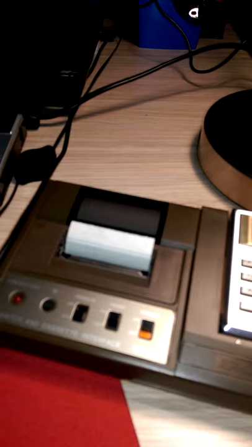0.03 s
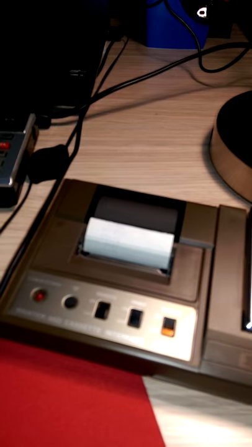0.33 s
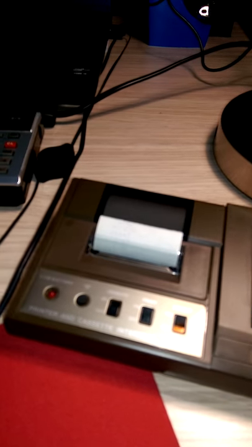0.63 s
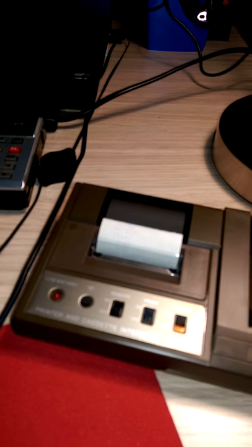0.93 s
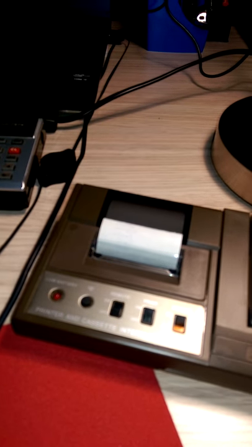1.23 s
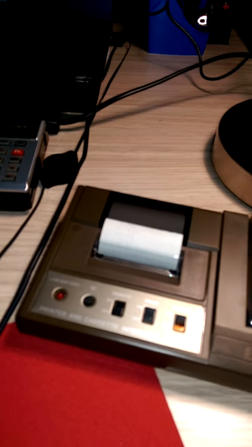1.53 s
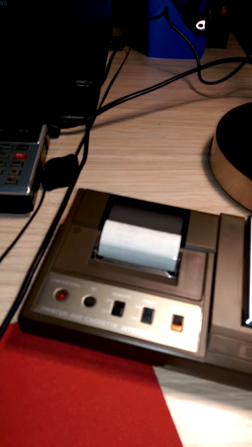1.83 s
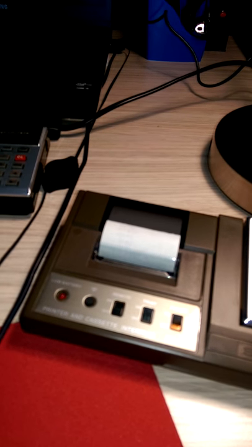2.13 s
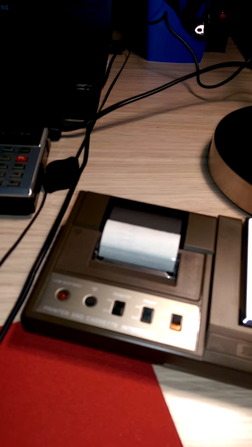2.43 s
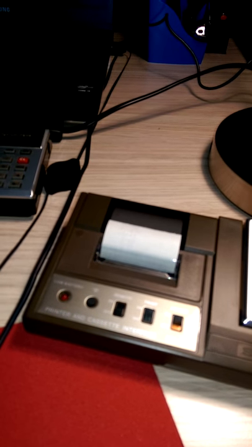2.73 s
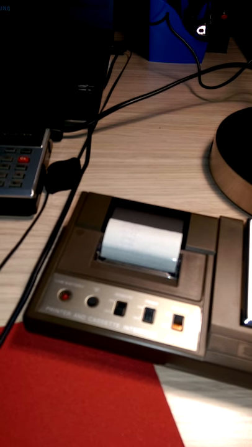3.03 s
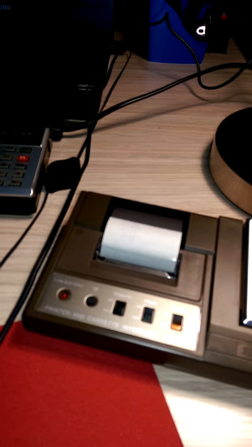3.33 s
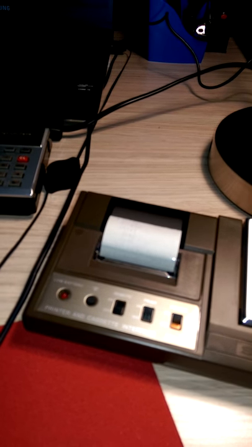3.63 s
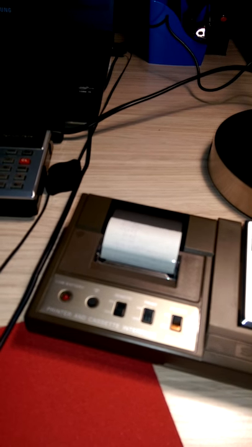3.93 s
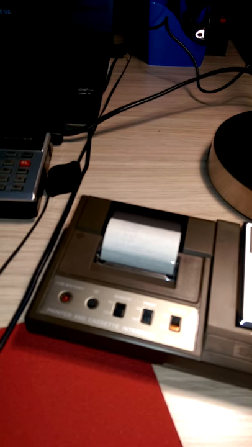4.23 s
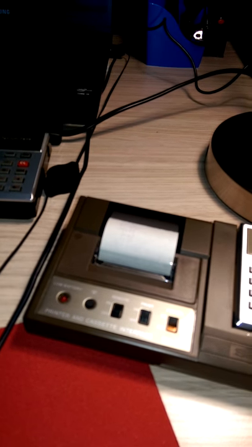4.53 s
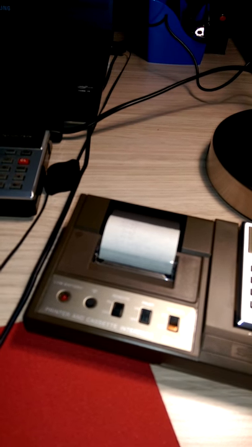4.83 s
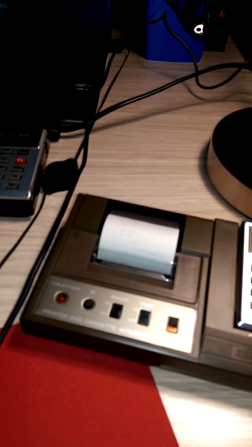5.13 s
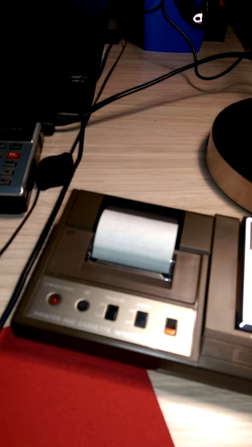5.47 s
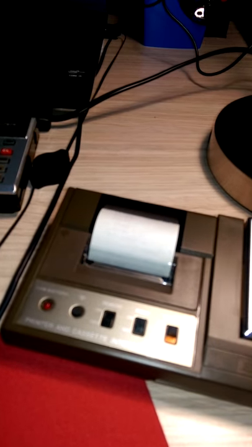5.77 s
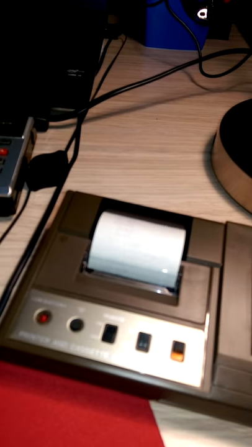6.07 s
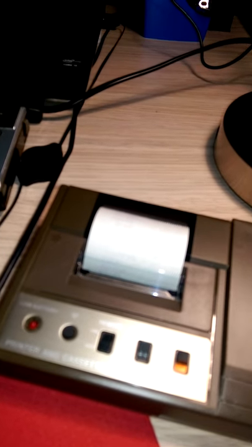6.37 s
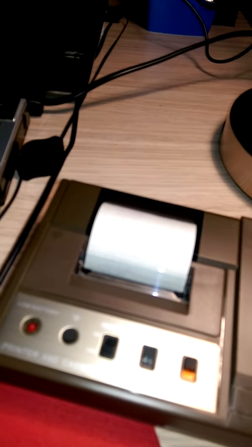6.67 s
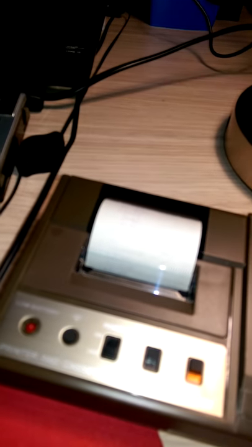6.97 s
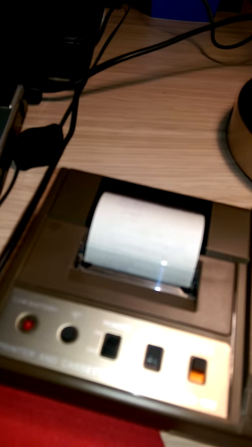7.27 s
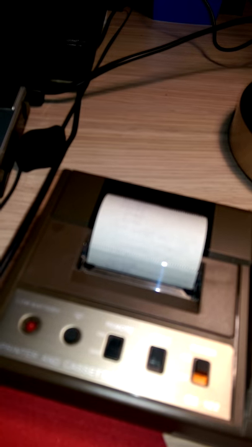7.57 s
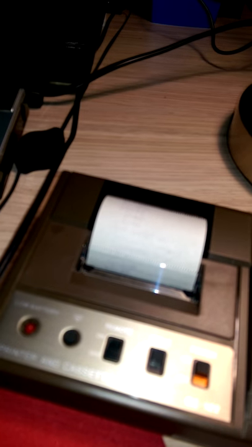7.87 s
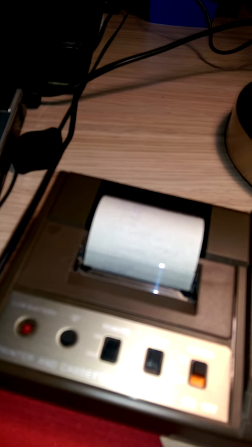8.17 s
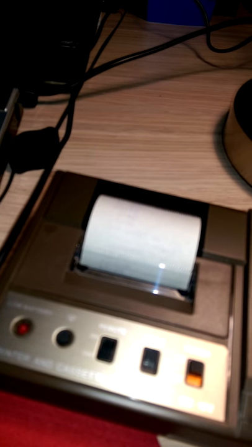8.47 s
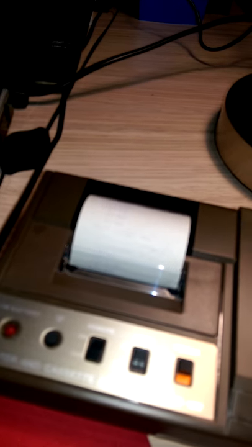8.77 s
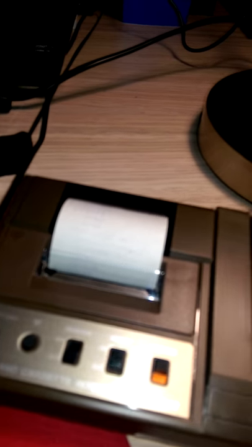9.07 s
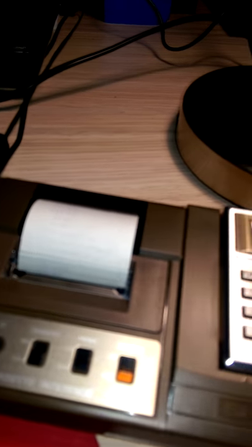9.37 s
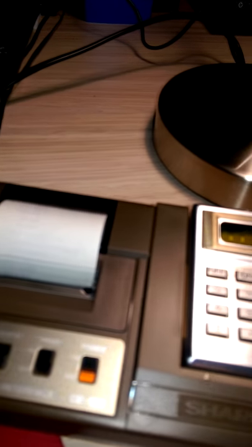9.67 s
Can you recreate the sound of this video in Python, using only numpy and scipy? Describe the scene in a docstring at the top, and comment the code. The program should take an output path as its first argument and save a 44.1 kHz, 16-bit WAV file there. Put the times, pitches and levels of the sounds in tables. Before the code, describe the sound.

Sharp buzzing bursts and rapid clicks come from a tiny mechanical printer, its geared motor whining until it cuts off in a quiet room.

```python
"""A shuttle dot-matrix printer

A tiny printer on a wooden desk prints six lines on a paper roll, then stops. A geared motor swings the
shuttle to and fro, one pass for each row of dots; the impacts of four needles excite resonances of the
platen, and a pawl steps the paper on. The left microphone port faces the printer, the right is
shaded. Mains hum fills the quiet room, and near the end a hand shifts on the microphone."""
import sys
import numpy as np
from scipy import signal
from scipy.fft import rfft, irfft, next_fast_len
from scipy.io import wavfile

SR = 44100
rng = np.random.default_rng(int(sys.argv[2]) if len(sys.argv) > 2 else 0)


def log_audio(samples):
    """Write samples as a 16-bit WAV file to the path given in sys.argv[1]."""
    # one column per channel
    frames = np.atleast_2d(samples).T
    # limit to full scale, then quantise
    limited = np.clip(frames, -1, 1)
    pcm = np.round(limited * 32767).astype(np.int16)
    wavfile.write(sys.argv[1], SR, pcm)


N = 427769
TIME = np.arange(N) / SR
QUADRATURE = np.array([[0], [np.pi / 2]])   # phases of two channels a quarter cycle apart

# even runs of needle blows, from a lone tick to a short rasp: start_s, length_s, dot_count, level_db
DOT_RUNS = [(0.0007, 0.0184, 4, 0), (0.0776, 0.0018, 3, 0), (0.0857, 0.049, 13, 0), (0.1937, 0.0018, 3, 0),
            (0.2059, 0.0442, 9, 0), (0.3052, 0.0082, 5, 2), (0.3206, 0.0168, 4, 2), (0.3426, 0.0073, 2, 0),
            (0.3574, 0.0059, 3, 1), (0.815, 0.0068, 5, 2), (0.832, 0.0057, 3, -4), (0.8483, 0.0095, 4, 2),
            (0.868, 0.0041, 2, -1), (0.9293, 0.0469, 13, -1), (0.9821, 0.0032, 2, 2),
            (1.0465, 0.0111, 2, 4), (1.0628, 0.0109, 5, 3), (1.0794, 0.0186, 4, 1), (1.1007, 0.0045, 4, 0),
            (1.1667, 0.0113, 4, 1), (1.1862, 0.0057, 3, 4), (1.2005, 0.0118, 4, 1), (1.2179, 0.012, 5, 0),
            (1.2862, 0.0286, 11, 2), (1.3206, 0.0143, 5, 3), (1.3424, 0.005, 4, 0), (1.4093, 0.0111, 2, 4),
            (1.4281, 0.0039, 2, -1), (1.4433, 0.0048, 3, 2), (1.4546, 0.0102, 2, 4), (1.5274, 0.0113, 6, 2),
            (1.5431, 0.0122, 5, -3), (1.5621, 0.0122, 6, 1), (1.5844, 0.0043, 2, -1),
            (2.0063, 0.0283, 11, 1), (2.0433, 0.0066, 4, 2), (2.0594, 0.0118, 2, 1), (2.1259, 0.0383, 8, 0),
            (2.1689, 0.0063, 2, 3), (2.1776, 0.0091, 2, 0), (2.241, 0.0492, 10, 0), (2.2927, 0.0088, 2, 2),
            (2.3565, 0.0079, 4, 2), (2.3728, 0.0084, 4, 1), (2.3893, 0.0293, 6, 0), (2.4726, 0.0061, 2, -1),
            (2.4887, 0.0268, 6, -1), (2.5215, 0.0111, 5, -2), (2.5875, 0.0163, 2, 1),
            (2.612, 0.0138, 7, -2), (2.6308, 0.0172, 4, 0), (2.7032, 0.0059, 2, 0), (2.719, 0.0116, 3, 2),
            (2.7381, 0.0068, 5, 1), (2.7533, 0.0116, 2, 0), (3.1855, 0.0079, 4, 3), (3.2048, 0.0054, 3, -1),
            (3.2884, 0.0213, 3, 1), (3.3145, 0.0213, 3, -1), (3.3952, 0.0107, 3, 1), (3.4161, 0.0059, 2, 0),
            (3.4374, 0.0109, 4, -4), (3.5098, 0.0054, 3, 1), (3.5254, 0.0057, 3, 0), (3.5474, 0, 1, -1),
            (3.62, 0.0107, 3, 1), (3.6415, 0.0161, 4, -4), (3.6707, 0.0029, 2, -1), (3.7388, 0.0136, 2, 1),
            (3.7599, 0.0079, 2, -2), (3.7839, 0.0025, 2, -1), (3.861, 0.0113, 5, 3),
            (3.8776, 0.0113, 5, -3), (4.3132, 0.0107, 5, 2), (4.3295, 0.0111, 2, 3), (4.346, 0.0082, 4, 2),
            (4.4277, 0.0159, 2, 1), (4.4483, 0.0027, 2, -1), (4.4544, 0.0238, 4, 2), (4.5408, 0.0161, 2, 2),
            (4.5594, 0.005, 2, 1), (4.5678, 0.024, 4, 3), (4.6549, 0.0082, 4, 2), (4.6714, 0.0166, 4, 3),
            (4.6916, 0.0082, 2, 3), (4.7705, 0.0161, 2, 3), (4.7893, 0.0172, 7, 0), (4.8147, 0.0107, 2, 1),
            (4.8857, 0.0159, 2, 1), (4.9125, 0.0238, 4, 1), (4.9989, 0.0163, 7, 1), (5.0229, 0.0172, 7, 0),
            (5.4832, 0.0111, 5, 4), (5.4991, 0.0113, 5, -1), (5.5864, 0.0127, 2, 0), (5.605, 0.0075, 2, 1),
            (5.6311, 0.0027, 2, 2), (5.6932, 0.022, 5, 1), (5.7252, 0.0086, 4, -1), (5.7447, 0.0027, 2, -1),
            (5.8102, 0.0052, 3, 2), (5.8229, 0.0093, 4, 3), (5.8508, 0, 1, -2), (5.9206, 0.0107, 3, 3),
            (5.9474, 0.0156, 2, 1), (5.9712, 0.0027, 2, 0), (6.0383, 0.0213, 2, 3), (6.0644, 0.0215, 3, -2),
            (6.1617, 0.0082, 4, 2), (6.1803, 0.0059, 3, -4)]
# a high, bright peak in hiss and clicks that shifts as the microphone moves: time_s, pitch_hz, level_db
BRIGHT_PEAK = [(1.4, 8654, -14.5), (1.7, 10820, -16.5), (2.8, 10690, -13.5), (3.5, 9590, 6.5),
               (5.2, 9310, 1)]
# spectrum of sliding friction: frequency_hz, level_db
FRICTION_SPECTRUM = [(800, -23), (2300, 2), (4400, -2), (5500, -6.5), (6500, -2), (10500, -3), (16000, -25)]
# hum of the mains, then of appliances: pitch_hz, level_db
HUM_TONES = [(120, -71), (224, -79), (325, -85)]


def needles(level_db=1, spread_db=1.5, frame_db=-5, bounce_s=.0061, bounce_db=-16):
    """Impact excitation: each dot is a blow, a metal crack and a rebound, and sets the printer ringing."""
    # spectrum of the impacts: frequency_hz, level_db
    impact_spectrum = [(90, -52), (700, -16.5), (1300, -14), (3200, -2.5), (4900, 1), (6100, 6.5),
                       (6850, -1), (7700, 3), (9300, 3), (10000, -3.5), (11500, 1.5), (15500, -12.5)]
    times, run_db = dots()
    strength, timing = rng.standard_normal((len(times), 2)).T
    gains = from_db(level_db + run_db + spread_db * strength)
    blows = clicks(times, gains)
    rebounds = clicks(times + bounce_s * (1 + .5 * timing), gains * from_db(bounce_db))
    impacts = blows + clatter(rebounds, t60_s=.0085) + from_db(frame_db) * clatter(blows, t60_s=.022)
    impacts += needle_cracks(times, gains)
    return colour(impacts, impact_spectrum) + ringing_tones(impacts)


def needle_cracks(times, gains, count=4, level_db=1, t60_s=.0085):
    """The needles fire in turn, each with its own impulse response, a burst of decaying noise."""
    age = TIME[:SR // 100]
    cracks = 0
    for k in range(count):
        crack = rng.standard_normal((2, len(age))) * from_db(-60 * age / t60_s)
        crack *= from_db(level_db) / np.linalg.norm(crack, axis=1, keepdims=True)
        crack[:, 0] = 0
        cracks += convolve(clicks(times[k::count], gains[k::count])[None], crack)
    return cracks


def ringing_tones(impacts, waver=.014):
    """Resonance: the platen rings; three more peaks colour the clicks and shift as the microphone moves."""
    # modes of the platen: pitch_hz, width_hz, level_db
    platen_modes = [(2554.5, 45, 9), (6140, 170, -8), (7960, 240, -5.5), (8898, 180, -8)]
    # the platen carries best at first, while the microphone faces it: time_s, level_db
    platen_reach = [(.2, 8.5), (.9, 2.5), (2.6, 6.5), (3.4, -2.5)]
    # lower ringing tone in the clicks, shifting from line to line: time_s, pitch_hz, level_db
    lower_tone = [(.3, 4500, 6), (1.4, 3851, -6.5), (2.05, 4300, 1), (3.5, 4200, -9), (5.8, 4050, 2.5)]
    # upper ringing tone, shifting likewise: time_s, pitch_hz, level_db
    upper_tone = [(.3, 6080, -0.5), (1.099, 5540, 5.5), (2.4, 5477, -10.5), (4.5, 5360, 2)]
    force = butterworth(impacts, 1200, "high")   # these tones carry no bass
    bend = 1 + waver * drift(60)   # the pitch wavers as the blows move along the platen
    platen = sum(from_db(db) * resonance(force, hz * bend, width) for hz, width, db in platen_modes)
    platen *= from_db(read(platen_reach, TIME)[0])
    bright = from_db(-7) * moving_ring(impacts, BRIGHT_PEAK, width_hz=600)
    lower = moving_ring(force, lower_tone, width_hz=300)
    upper = moving_ring(force, upper_tone, width_hz=230)
    return platen + bright + lower + upper


def dots():
    """Evenly spaced impulses make a rasp: the time (s) and level (dB) of every dot."""
    return np.transpose([(time_s, db) for start, length, count, db in DOT_RUNS
                         for time_s in np.linspace(start, start + length, round(count))])


def drive(flutter=.004304, wander=.003, gear_db=-35, thrum_db=-69):
    """Cyclic loading: whine, gear rattle and friction swell with each pass; the case resonates."""
    # one pass, pawl to pawl: pass_share, gear_db, whine_db, friction_db, speed_factor
    load_cycle = [(0, 0, -4.5, -3, 1.01), (.12, 2, -4.5, -0.5, 1.03), (.22, -4.5, 3, -2.5, 1),
                  (.35, -1, 2.5, -4, .985), (.48, -2, -5.5, -3.5, 1.005), (.6, -1.5, 5, -4, 1.018),
                  (.69, -2.5, 6.5, -2, .985), (.79, -3, -9.5, -3.5, .955), (.93, 0, 1.5, -2.5, .98),
                  (1, 2, -2.5, 6, 1.01)]
    # spectrum of the rattling teeth: frequency_hz, level_db
    gear_spectrum = [(60, -36.5), (270, -20.5), (330, -9.5), (410, -16.5), (520, -8), (660, -5.5),
                     (1150, -8.5), (1500, -6), (1850, 4.5), (2100, -17), (4500, -16), (12000, -50.5)]
    # modes of the plastic case: pitch_hz, t60_s, level_db
    case_modes = [(324.9, 0.18, -59.5), (1870, 0.08, -54)]
    speed_hz, effort_db = motor()
    load_db, mesh_db, friction_db, pace = read(load_cycle, pass_share())
    angle = phase(speed_hz * pace * (1 + flutter * drift(150) + wander * drift(20)))
    whine = gear_whine(angle, mesh_db)
    teeth = contact_noise(angle, rough_hz=400)
    gears = from_db(gear_db + load_db) * rms_one(colour(teeth, gear_spectrum))
    case_force = teeth * from_db(effort_db + load_db)
    case = sum(from_db(db) * rms_one(ring(case_force, hz, t60_s)) for hz, t60_s, db in case_modes)
    thrum = from_db(thrum_db) * np.sin(angle / 3) * np.sqrt(2)   # a 3:1 reduction gear
    friction = from_db(friction_db) * shuttle_friction(angle)
    return case + from_db(effort_db) * (whine + thrum + gears + friction)


def gear_whine(angle, mesh_db, mesh_order=6, rough_db=2.5, trim_db=-7.5):
    """Periodic tooth contact gives harmonics of the rotation; the higher ones vary more with the load."""
    # partials of motor and gears: shaft_order, level_db
    partials = [(1, -56), (2, -46), (3, -45), (5, -43.5), (6, -35.5), (7, -50)]
    whine = 0
    for order, db in partials:
        level_db = db + trim_db + mesh_db * order / mesh_order + rough_db * drift(130)
        whine += from_db(level_db) * np.sqrt(2) * np.sin(round(order) * angle + QUADRATURE)
    return whine


def shuttle_friction(angle, hiss_db=-32.5, peak_db=-40, half_width_hz=450):
    """Sliding friction gives a broad hiss; a high, bright peak in it shifts as the microphone moves."""
    grit = contact_noise(angle, rough_hz=900)
    hiss = from_db(hiss_db) * rms_one(colour(grit, FRICTION_SPECTRUM))
    peak_hz, reach_db = read(BRIGHT_PEAK, TIME)
    band = butterworth(grit, half_width_hz) * np.sin(phase(peak_hz))
    return hiss + from_db(peak_db + .5 * reach_db) * rms_one(band)


def contact_noise(angle, rough_hz, rough_db=3, throb=.24):
    """Amplitude modulation: the noise of rough contact flickers and throbs once per motor turn."""
    noise = rng.standard_normal((2, N))
    return noise * from_db(rough_db * drift(rough_hz)) * (1 + throb * np.sin(angle))


def motor(free_hz=324, print_sag=.04, coast_sag=.17, labour_db=1.5, stop_s=6.48):
    """Speed (Hz) and level (dB): load slows the motor and makes it louder; unpowered, it coasts."""
    lead_s, overrun_s, dot_s = .092, .027, .00276
    steps = paper_steps()
    powered = during(steps[:, 0] - lead_s, np.minimum(steps[:, -1] + overrun_s, stop_s))
    running = follow(powered, time_s=.017914)
    start, length, *_ = np.transpose(DOT_RUNS)
    load = follow(during(start, start + length + dot_s), time_s=.03)
    speed_hz = free_hz * (1 - print_sag * load) * (1 - coast_sag * (1 - running))
    return speed_hz, 20 * np.log10(running) + labour_db * load


def paper_steps(dot_rows=7, blank_rows=3, blank_pass_s=.1105):
    """The pawl's rhythm, one step a pass, quicker on blank rows: times (s) by line and row."""
    # printed lines, the first already under way: first_step_s, printing_pass_s
    text_lines = [(-.405, 0.1157), (.797, 0.1193), (1.993, 0.117), (3.156, 0.11196), (4.298, .1144),
                  (5.453, 0.11452)]
    start, pass_s = np.transpose(text_lines)[:, :, None]
    row = np.arange(dot_rows + blank_rows)
    return start + pass_s * np.minimum(row, dot_rows) + blank_pass_s * np.maximum(row - dot_rows, 0)


def pass_share():
    """The phase of the shuttle's cycle, 0 to 1 between paper steps."""
    steps = paper_steps().ravel()
    return np.interp(TIME, steps, np.arange(len(steps))) % 1


def pawl(level_db=-6, spread_db=2, catch_s=.009, catch_db=-5, t60_s=.009):
    """A double impact: the pawl ticks over a ratchet tooth, then snaps in."""
    # spectrum of the snap: frequency_hz, level_db
    snap_spectrum = [(300, -8), (7000, 4), (15500, -11)]
    steps = paper_steps()
    times = steps[steps > 0]
    gains = from_db(level_db + spread_db * rng.standard_normal(len(times)))
    snap = clatter(clicks(times, gains), t60_s)
    catch = clatter(clicks(times - catch_s, gains * from_db(catch_db)), t60_s)
    return colour(snap, snap_spectrum) + colour(catch, FRICTION_SPECTRUM)


def knocks(spread_db=.5, jitter_s=.0012):
    """Soft impacts of cam and pawl recur in every pass; each makes one damped mode swell and die."""
    # knocks of one pass: pass_share, pitch_hz, rise_s, peak_db
    knock_modes = [(0.039, 338.5, 0.0053, -49), (.09, 1016, 0.0049, -41), (0.129, 1739, 0.0057, -36),
                   (0.912, 3980, 0.0022, -35.5), (.98, 6489, 0.0011, -34.5)]
    steps = paper_steps().ravel()
    number, age = np.arange(len(steps)), TIME[:SR // 20]
    sound = 0
    for share, hz, rise_s, db in knock_modes:
        times = np.interp(number[:-1] + share, number, steps)
        timing, softness = rng.standard_normal((len(times), 2)).T
        hits = clicks(times + jitter_s * timing, (times > 0) * from_db(db - spread_db * softness))
        swell = age / rise_s * np.exp(1 - age / rise_s)
        sound += convolve(hits[None], swell * np.sin(2 * np.pi * hz * age + QUADRATURE))
    return from_db(motor()[1]) * sound


def spring(level_db=-37, rough_db=3, flutter=.0097):
    """Frequency modulation: the pawl's spring gives a rough falling chirp as it is drawn back."""
    # glide before each paper step: pass_share, pitch_hz, gain
    glide = [(.83, 2720, 0.0069), (.89, 2408, 1), (.94, 2229, 1), (.99, 2055, 0.095)]
    hz, gain = read(glide, pass_share())
    angle = phase(hz * (1 + flutter * drift(300)))
    return gain * from_db(level_db + motor()[1] + rough_db * drift(300)) * np.sin(angle + QUADRATURE)


def beaming(x, band_hz=(10700, 12100)):
    """Directivity: the treble beams, so its level depends on where the microphone is held."""
    # level of the treble band: time_s, level_db
    treble_reach = [(.3, -7), (1.3, -1.5), (3.2, 4.5), (4.8, -2)]
    band = signal.sosfiltfilt(signal.butter(2, band_hz, "band", fs=SR, output="sos"), x)
    return x + (from_db(read(treble_reach, TIME)[0]) - 1) * band


def ports(x, lag_s=0):
    """Coherence: long waves reach both ports much alike, short ones differ; the right lags by lag_s."""
    # likeness of the two ports: frequency_hz, correlation
    coherence = [(130, 0.54), (640, 0.908), (1400, 0.31), (3000, 0.041)]
    size = next_fast_len(N + SR // 10)
    left, right = rfft(x, size)
    hz = np.fft.rfftfreq(size, 1 / SR)
    alike = np.clip(at_hz(coherence, hz), 0, 1)
    right = (alike * left + np.sqrt(1 - alike ** 2) * right) * np.exp(-2j * np.pi * hz * lag_s)
    return irfft(np.array([left, right]), size)[:, :N]


def shadow(x):
    """Acoustic shadow: the microphone's body screens the right port from short waves."""
    # response of the right port: frequency_hz, gain_db
    shade = [(200, -5.5), (700, 1.5), (1300, -3.5), (2200, -2.5), (3000, -8.5), (4200, -12), (5600, -25),
             (9000, -26.5), (11500, -22), (13800, -7)]
    return np.vstack([x[:1], colour(x[1:], shade)])


def room(x, wet_db=-20, t60_s=.45, dull_hz=3500, gap_s=.006):
    """Reverberation: a small furnished room answers with a faint, dull, exponentially decaying tail."""
    age = TIME[:SR // 2]
    tail = rng.standard_normal((2, len(age))) * from_db(-60 * age / t60_s) * (age > gap_s)
    tail = butterworth(tail / np.linalg.norm(tail[0]), dull_hz, order=1)
    return from_db(wet_db) * convolve(x[:1], tail)


def handling(attack_s=.0169, squeak_db=-64, squeak_width_hz=160):
    """Structure-borne sound: a hand shifting on the microphone thuds, rubs and briefly squeaks."""
    # shifts of the grip: start_s, decay_s, level_db
    grips = [(8.685, 0.0117, -49), (8.72, 0.302, -62)]
    # spectrum of thud and rub: frequency_hz, level_db
    grip_spectrum = [(40, -29.5), (235, 0.5), (450, -14.5), (14000, -31)]
    # glide of the squeak: time_s, pitch_hz, gain
    glide = [(8.72, 2119, 0.031), (8.76, 2033, 1), (8.87, 1924, 0.083)]
    envelope = sum(from_db(db) * (TIME > start) * np.exp(-np.abs(TIME - start) / decay_s)
                   for start, decay_s, db in grips)
    rub = follow(envelope, attack_s) * rms_one(colour(rng.standard_normal((2, N)), grip_spectrum))
    hz, gain = read(glide, TIME)
    squeak = rms_one(resonance(rng.standard_normal((2, N)), hz, squeak_width_hz))
    return ports(rub + from_db(squeak_db) * gain * squeak)


def transformer(hum_db=-70):
    """Magnetic hum: the mains transformer sounds harder while the motor draws current."""
    mains = np.sqrt(2) * np.sin(2 * np.pi * HUM_TONES[0][0] * TIME)
    return from_db(hum_db + motor()[1]) * mains


def background(floor_db=-69.5):
    """Ambient noise: steady hum tones over the broadband floor of still air."""
    # spectrum of the quiet room: frequency_hz, level_db
    floor_spectrum = [(25, -9.5), (80, -0.5), (280, -3), (900, -14.5), (14000, -23)]
    hum = sum(from_db(db) * np.sqrt(2) * np.sin(2 * np.pi * hz * TIME) for hz, db in HUM_TONES)
    air = rms_one(colour(rng.standard_normal((2, N)), floor_spectrum))
    return hum + from_db(floor_db) * ports(air)


def clatter(hits, t60_s):
    """Dense modes merge into noise: each hit leaves a decaying burst with the hit's own energy."""
    decay = from_db(-120 / (t60_s * SR))
    energy = signal.lfilter([1 - decay], [1, -decay], hits ** 2 + 1e-18)
    return np.sqrt(energy) * rng.standard_normal((2, N))


def ring(x, hz, t60_s):
    """A damped oscillator: a unit impulse starts a decaying sine of height 1."""
    decay, step = from_db(-60 / (t60_s * SR)), 2 * np.pi * hz / SR
    return signal.lfilter([0, np.sin(step)], [1, -2 * decay * np.cos(step), decay ** 2], x + 1e-18)


def resonance(x, hz, width_hz):
    """A resonator of gain 1 whose centre may move."""
    carrier = np.exp(1j * phase(hz))
    return 2 * np.real(carrier * follow(x / carrier, 1 / (np.pi * width_hz)))


def moving_ring(x, track, width_hz):
    """A resonator whose centre and gain follow a table."""
    hz, db = read(track, TIME)
    return from_db(db) * resonance(x, hz, width_hz)


def colour(x, spectrum, size=2048):
    """A minimum-phase filter with the given spectrum, made causal by folding the cepstrum."""
    cepstrum = irfft(np.log(from_db(at_hz(spectrum, np.fft.rfftfreq(size, 1 / SR)))))
    cepstrum[1:size // 2] *= 2
    cepstrum[size // 2 + 1:] = 0
    return convolve(x, irfft(np.exp(rfft(cepstrum)))[None])


def convolve(x, response):
    """Superposition: every sample starts a copy of the impulse response."""
    return signal.oaconvolve(x, response, axes=1)[:, :N]


def butterworth(x, hz, kind="low", order=2):
    """A filter with a maximally flat passband."""
    return signal.sosfilt(signal.butter(order, hz, kind, fs=SR, output="sos"), x)


def follow(x, time_s):
    """A first-order lag with the given time constant."""
    decay = np.exp(-1 / (time_s * SR))
    return signal.lfilter([1 - decay], [1, -decay], x + 1e-9)


def clicks(times, gains):
    """An impulse of the given height at each time."""
    return np.bincount(np.clip(np.round(times * SR).astype(int), 0, N - 1), gains, N)


def during(starts, ends):
    """A gate: 1 within the spans, 0 outside."""
    return np.cumsum(clicks(starts, np.ones(len(starts))) - clicks(ends, np.ones(len(ends))))


def drift(rate_hz):
    """Random fluctuation of unit rms, with rate_hz new values a second."""
    return rms_one(np.interp(TIME * rate_hz, np.arange(N // 10), rng.standard_normal(N // 10)))


def phase(hz):
    """Phase in radians, the integral of frequency."""
    return 2 * np.pi * np.cumsum(hz) / SR


def read(rows, at):
    """Linear interpolation of a table's columns along its first."""
    key, *columns = np.transpose(rows)
    return [np.interp(at, key, column) for column in columns]


def at_hz(points, hz):
    """Interpolation on a logarithmic frequency axis."""
    key, value = np.transpose(points)
    return np.interp(np.log(hz + 1), np.log(key), value)


def from_db(db):
    """Decibels to amplitude gain."""
    return 10 ** (np.asarray(db) / 20)


def rms_one(x):
    """Scale to unit rms."""
    return x / np.sqrt(np.mean(x ** 2) + 1e-20)


def scene():
    """Superposition at two ports: the printer's direct sound, its reverberation, hum and handling."""
    mechanism = needles() + pawl() + knocks() + spring() + drive()
    printer = ports(beaming(mechanism), lag_s=.0001219)
    return shadow(printer) + room(printer) + transformer() + background() + handling()


def record(dry, cutoff_hz=15900):
    """Soft saturation rounds the sharpest treble peaks; a steep low-pass limits the bandwidth."""
    distortion = np.tanh(dry) - dry
    rounded = dry + butterworth(distortion, 900, "high")
    return signal.sosfilt(signal.ellip(10, .1, 70, cutoff_hz, fs=SR, output="sos"), rounded)


dry = scene()
out = record(dry)
log_audio(out)
```